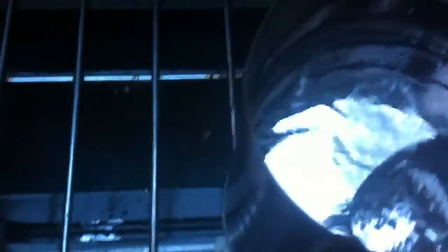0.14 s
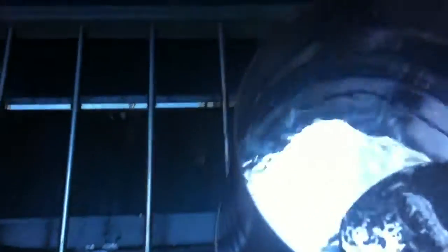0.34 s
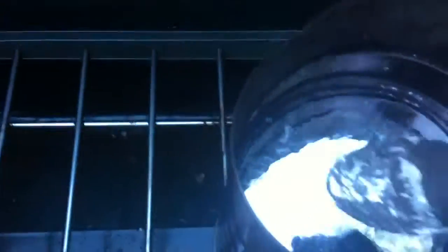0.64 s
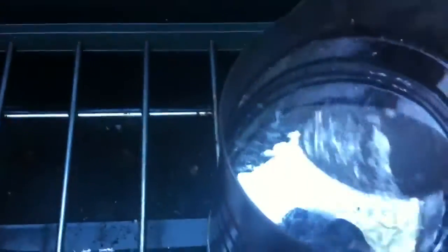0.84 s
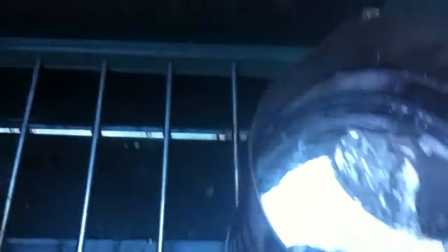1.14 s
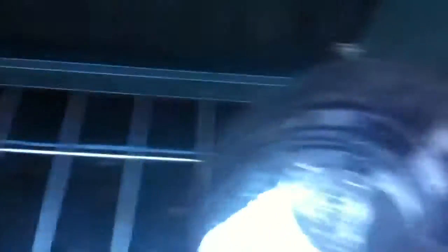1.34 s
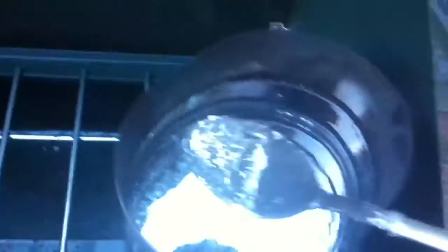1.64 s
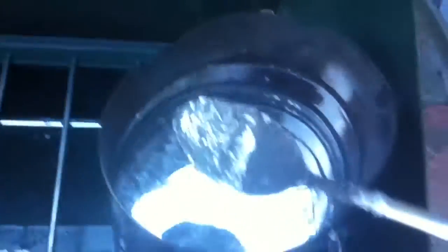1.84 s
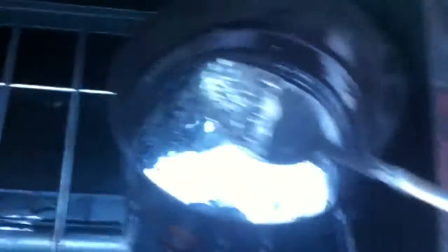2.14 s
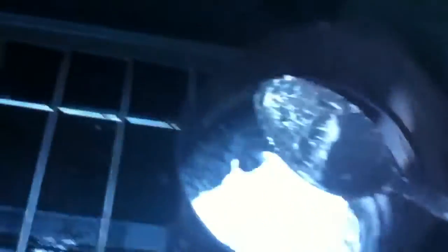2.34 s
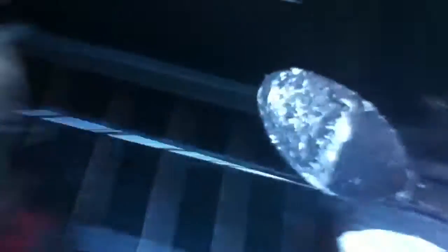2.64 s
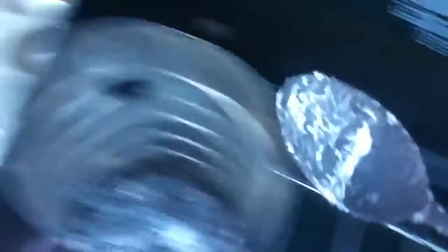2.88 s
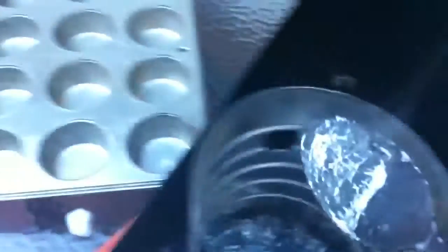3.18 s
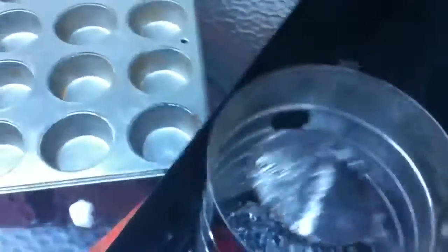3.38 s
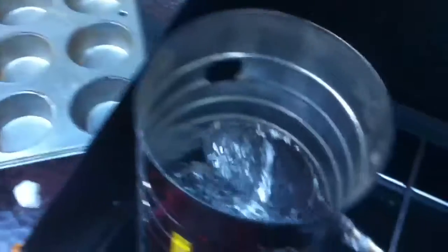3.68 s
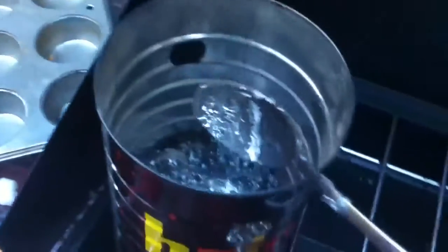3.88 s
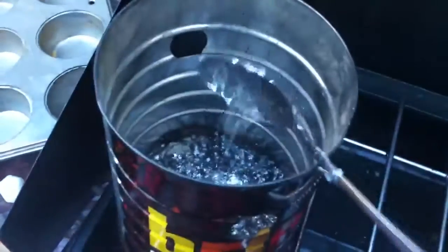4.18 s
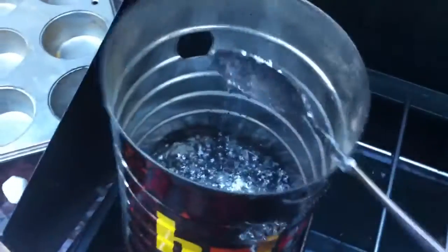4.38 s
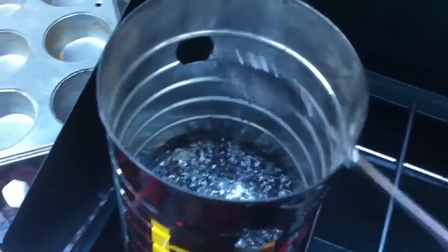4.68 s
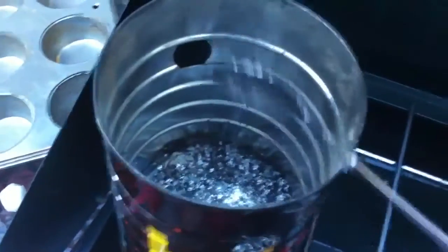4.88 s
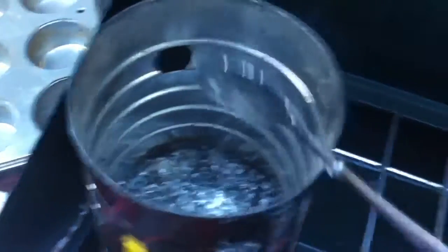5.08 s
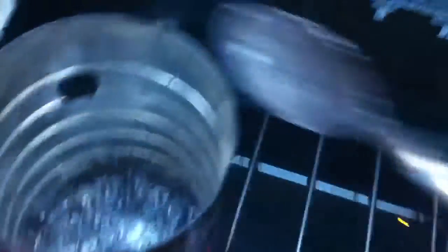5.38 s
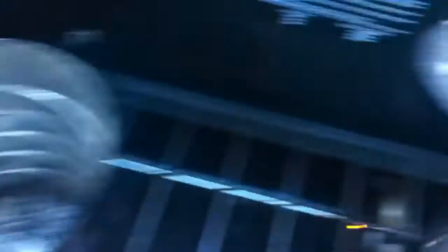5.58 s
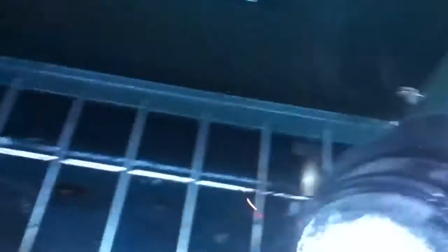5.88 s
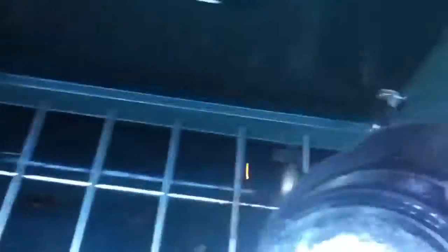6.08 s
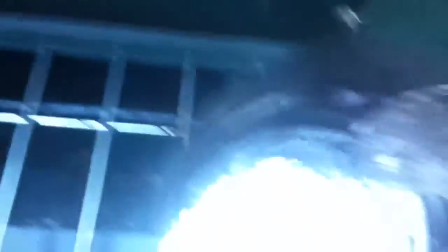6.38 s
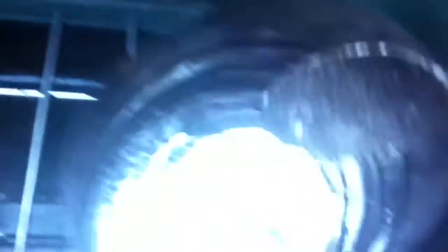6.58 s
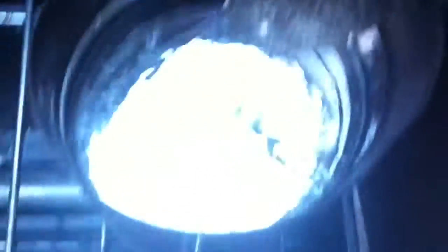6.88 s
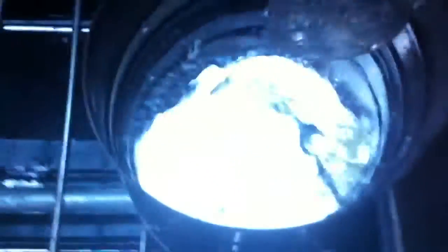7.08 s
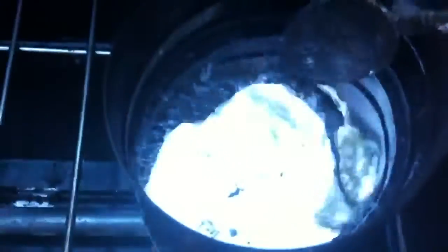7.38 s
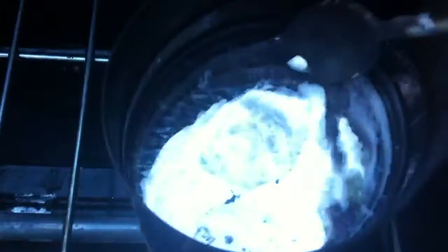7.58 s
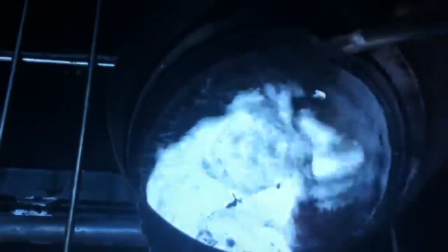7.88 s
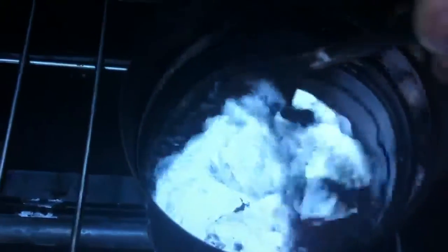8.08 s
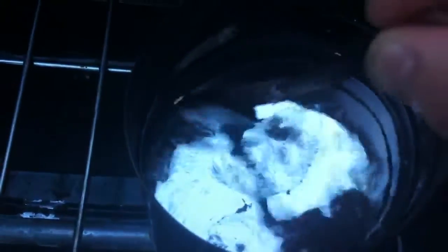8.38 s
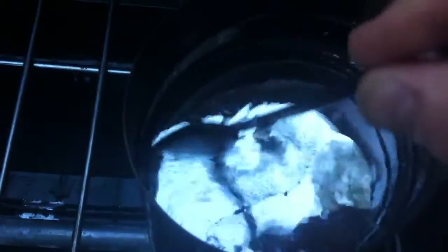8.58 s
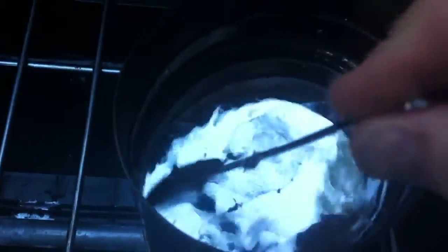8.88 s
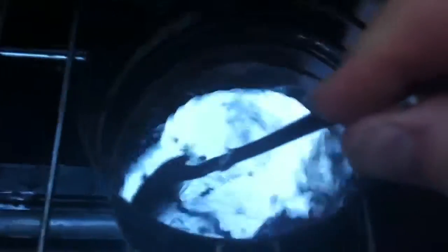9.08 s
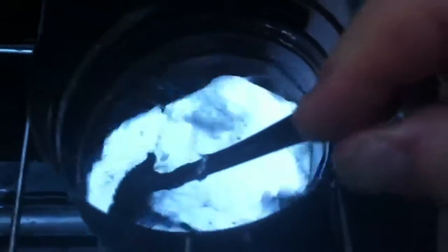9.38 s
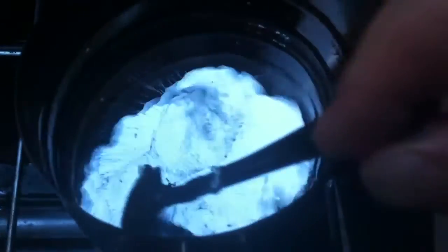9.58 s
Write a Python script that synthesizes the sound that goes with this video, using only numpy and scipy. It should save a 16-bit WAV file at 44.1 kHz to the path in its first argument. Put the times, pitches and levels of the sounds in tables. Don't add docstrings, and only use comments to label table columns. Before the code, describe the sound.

Close, thin-sounding pickup at a camp stove: a constant whistly, airy gas hiss with fluttering low flame. Midway comes a soft thud on tin, then about a second of irregular sharp metallic knocks with short hollow ring and small bounces. A tiny tick and a loud dull grate bump with quick rattle follow. Afterward only hiss remains, with a faint dull rustling scrape at the end.

```python
import sys
import numpy as np
from scipy import signal
from scipy.io import wavfile
from scipy.ndimage import uniform_filter1d, minimum_filter1d

SR = 44100
rng = np.random.default_rng(int(sys.argv[2]) if len(sys.argv) > 2 else 0)


def to_linear_factor(level_db):
    exponent = np.asarray(level_db, float) / 20
    return 10 ** exponent


def unload_audio(sound):
    columns = np.transpose(np.atleast_2d(sound))
    steps = np.round(np.clip(columns, -1, 1) * 32767)
    wavfile.write(sys.argv[1], SR, steps.astype(np.int16))


N = 429534
BLOWS_FROM_S, BLOWS_FOR_S = 3.5, 3.5

# time_s, gain_db
NEARNESS = [(0, 2), (.7, .5), (1.5, .5), (2.3, -1), (2.7, .5), (3.1, -.5), (3.6, 0), (4.15, -1),
            (5.5, -0.5), (6.0, 0.5), (6.5, -1.5), (7.2, -2.5), (7.9, -1), (8.6, 0), (9.2, -1), (9.74, -2.5)]
# time_s, share_0_to_1
ASIDE = [
    (0, 0.26),
    (2.75, 0.03),
    (3.0, 0.91),
    (5.5, 0.83),
    (5.9, 0.12),
    (9.74, 0),
]
# freq_hz, level_db_per_hz
FLAME = [(18, -79), (30, -36), (80, -15), (99, -14), (150, 2.5), (500, -10), (690, -9.5), (1150, -13.5),
         (1400, -27), (1820, -58), (3080, -120)]
# freq_hz, width_hz, level_db
JET_EDGE = [(13280, 170, -9), (13810, 120, -11), (14400, 260, -12), (14900, 220, -14), (15680, 150, -8)]
# freq_hz, width_hz, level_db
TUBE_OVER = [(688.0, 40, -1), (1715.5, 98, 2), (2017, 91, 1), (2146, 95, 1.5), (2306, 138, -4),
             (2584, 42, -1.5), (2975, 166, -4.0), (3270, 115, -13), (3787, 217, -10.0), (4160, 65, -17),
             (4490, 56, -8.5), (5115, 430, -16), (5797, 80, -13.0), (6225, 55, -12.0), (6813, 200, -12.0),
             (7384, 85, -9.0), (8030, 84, -7.5), (8640, 80, -14.5), (8650, 80, -18.5), (9340, 91, -14.0),
             (10000, 97, -10.5), (10750, 300, -13), (11600, 64, -27.0),
             (7660, 130, -14)] + [(1442, 130, -7), (11280, 79, -18.5), (12700, 120, -12)] + JET_EDGE
# freq_hz, width_hz, level_db
TUBE_ASIDE = [(710, 16, -15), (980, 33, -16.5), (1430, 82, -9.5), (1735, 73, -6.0), (2006, 42, 0.5),
              (2530, 31, -13), (3010, 36, -65), (3600, 510, -31.5), (4800, 1700, -11.5), (5380, 18, -11),
              (5680, 71, -5.5), (7030, 300, -11.5), (7670, 80, -5), (8400, 64, -7.0), (9600, 75, -21),
              (8900, 49, -29), (9260, 73, -22), (9950, 260, -18), (10500, 120, -10), (11700, 170, -34),
              (13100, 250, -17), (13140, 84, -5.5), (13700, 56, -18), (14000, 76, -5), (14400, 200, -22),
              (15200, 200, -14), (14360, 180, -2.5), (16300, 160, 1), (10900, 150, -22)]


def burner():
    near_db, = in_time(NEARNESS)
    aside, = in_time(ASIDE)
    flame_db = -57 + 0.17 * near_db
    low_db = -46.5 + 1.16 * near_db
    high_db = -50.5 + 0.27 * near_db

    flame = 0
    for hz, noise in bands(27.44, count=12, size=N):
        flame = flame + to_linear_factor(at_hz(FLAME, hz)) * wander((8, 2.5)) * noise
    flame = to_linear_factor(flame_db) * np.sqrt(shudder()) * rms_one(flame)

    over = tube(TUBE_OVER, low_db + 0.23, high_db + 0.51, sway_db=1.8, widen=1.34, span=slice(0, N))
    swing = slice(round(2.6 * SR), round(6.1 * SR))
    side = tube(TUBE_ASIDE, low_db + 0.24, high_db + 0.14, sway_db=2.2, widen=2.22, span=swing)
    diffuse = to_linear_factor(-56 + near_db) * filtered(rng.standard_normal(N), 2, 4100, "high")
    jet = np.sqrt(1 - aside) * over + np.sqrt(aside) * side + diffuse
    jet = wander((14, 0.5)) * reflected(jet)
    top_cut = signal.ellip(10, 0.5, 60, 15800, fs=SR, output="sos")
    return flame + signal.sosfilt(top_cut, jet)


def tube(peaks, low_db, high_db, sway_db, widen, span):
    out = np.zeros((2, N))
    jet = rng.standard_normal((2, N))[:, span]
    for k, (hz, width_hz, top_db) in enumerate(peaks):
        width_hz = max(width_hz, hz / 70) * widen
        spread_db = sway_db * min(1, hz / 5000 + 0.1)
        gain = to_linear_factor(top_db) * wander((1.5, spread_db), (7, 0.38 * sway_db))[span]
        once = resonate(jet[k % 2], hz, width_hz)
        out[int(hz > 4000), span] += gain * resonate(once, hz, width_hz)
    low_rms, high_rms = np.sqrt(np.mean(out[:, span] ** 2, axis=1))
    return to_linear_factor(low_db) * out[0] / low_rms + to_linear_factor(high_db) * out[1] / high_rms


def reflected(x):
    lag_s, gain = 0.0011, 0.25
    place = np.arange(N) - lag_s * SR * wander((0.8, 0.4))
    below = np.clip(place.astype(int), 0, N - 2)
    share = np.clip(place - below, 0, 1)
    echo = (1 - share) * x[below] + share * x[below + 1]
    return (x + gain * echo) / np.sqrt(1 + gain ** 2)


def shudder():
    gain = np.ones(N)
    for s, db, *_ in [*KNOCKS, *BUMPS]:
        if db > -15:
            gain += to_linear_factor(db + 25) * decay_from(s, 0.28)
    return gain


# start_s, peak_db, cavity_hz, ring_on_db, brightness_db
KNOCKS = [(4.2009, -13.5, 376, 1.5, -9), (4.4573, -10, 476, 1.5, -13), (4.5557, -35, 457, 18.5, -16),
          (4.6918, -11.5, 450, 1.5, -12.5), (4.7456, -37.5, 506, 12, -10), (4.855, -57, 363, 4, -34),
          (4.9037, -10.5, 440, 0.5, -15.5), (4.9683, -26.5, 418, 2.5, -16), (5.0143, -34.5, 366, 3, -11.5),
          (5.1029, -9.5, 438, 1.5, -14), (5.1812, -19, 380, -2, -12), (5.2311, -26, 356, 1, -16),
          (5.319, -40, 496, -23, -31), (5.461, -37, 423, -7, -29)]
# start_s, peak_db
SKIPS = [(4.557, -16), (4.746, -16.5), (4.854, -39), (4.968, -20.5), (5.181, -13.5), (5.23, -23),
         (5.32, -35), (5.375, -41), (5.414, -42), (5.445, -40), (5.503, -41)]
# freq_hz, level_db, t60_s
TIN = [(361, -4, 0.45), (786, -7, 0.41), (942, -9, 0.5), (1099, -9, 0.44), (1425, -8, 0.3), (1783, -3, 0.2),
       (1889, -3, .18), (2042, -5, 0.2), (2185, -6, 0.15), (2600, -5, .15), (2749, -3, .15),
       (2913, -4, 0.15), (3120, -1, 0.09), (3304, 1, 0.1), (3438, -1, 0.12), (3809, -1, 0.1),
       (4059, -2, 0.12), (4536, 4, 0.17), (4690, -5, .12), (4220, 2, 0.06), (5250, -6, .1),
       (6908, -3, 0.08), (7700, -8, .1), (5000, -7, 0.1), (9588, -6, 0.09), (10100, -9, 0.05),
       (11100, -14, 0.07)]
# freq_hz, level_db_per_hz
TIN_BODY = [(35, -67), (60, -57), (190, -6), (297, -12), (359, -0.5), (662, -18.5), (1740, -7), (3300, -8),
            (3700, -10.5), (6350, -16), (9930, -11.5), (15200, -21), (16000, -50)]
# freq_hz, t60_s
TIN_T60 = [(120, 0.9), (400, 0.46), (1000, 0.59), (2500, 0.21), (6000, 0.21), (15000, 0.098)]
# freq_hz, level_db, t60_s
WIRE = [(215, -36, 2.5), (365, -38, 2.5), (540, -37, 3.5)]


def tin():
    s, peak_db, cavity_hz, ring_db, bright_db = np.transpose(KNOCKS)
    walls = struck(s, peak_db - 10.5, -2, bright_db + 10.5, ring_db, TIN, TIN_BODY, TIN_T60,
                   modes_db=-10, body_db=18, crack_db=3)
    air = cavity(s + 0.00309, peak_db + 3.5, cavity_hz, t60=0.03)
    late = s > 5.05
    wires = sum(ring(clicks_at(s[late], peak_db[late] + db + 3), hz, t60) for hz, db, t60 in WIRE)
    spoon = 0
    for k, (start_s, db) in enumerate(SKIPS):
        bowl_hz = 2760 - 169 * (k % 3 == 0)
        spoon = spoon + ring(clicks_at([start_s], db), bowl_hz, 0.032)
    return walls + air + wires + spoon


def cavity(times, level_db, pitch_hz, t60):
    notes = zip(times, level_db, pitch_hz)
    return sum(resonate(ring(clicks_at([s], db), hz, t60), hz, 90) for s, db, hz in notes)


# start_s, peak_db
BUMPS = [(5.649, -8), (5.664, -16.5), (5.683, -24.5), (5.692, -28.5), (5.71, -20), (5.718, -31),
         (5.726, -20.5), (5.733, -29), (5.746, -38), (5.766, -50), (5.802, -46), (5.852, -45), (6.102, -44)]
# freq_hz, level_db, t60_s
GRATE = [(219, -4, 0.56), (313, 3, 0.27), (745, 4, 0.55), (883, 12, 0.39), (1000, 0, 0.33), (1200, 7, 0.5),
         (1287, 14.5, 0.41), (1403, 17, 0.25), (1870, -5, 0.22), (2610, 5, 0.23), (2620, -13, 0.25),
         (2977, -29, 0.51), (3343, -25, 0.46), (4180, -4, 0.45), (4040, -9, 0.47), (4700, -14, 0.39)]
# freq_hz, level_db_per_hz
GRATE_BODY = [(35, -61), (60, -40), (209, -2), (465, -7), (536, -4), (647, -11), (1410, -2), (2200, -8),
              (12000, -40), (15500, -53), (16700, -63)]
# freq_hz, t60_s
GRATE_T60 = [(120, 1), (400, 0.62), (1500, 0.41), (5000, 0.44), (15000, 0.22)]


def grate():
    s, peak_db = np.transpose(BUMPS)
    bright_db = np.interp(s - s[0], [0, 0.018], [-17, 10])
    return struck(s, peak_db - 16.5, 0.1, bright_db, 0.11, GRATE, GRATE_BODY, GRATE_T60,
                  modes_db=-14, body_db=12, crack_db=17.5)


# time_s, scrape_db
SKIM = [(7.3, -79), (7.9, -58.5), (8.1, -54.5), (8.3, -58.5), (8.6, -52.5), (9.2, -51), (9.4, -62),
        (9.55, -56), (9.74, -51.5)]
# start_s, level_over_scrape_db
NUDGES = [
    (7.65, 16),
    (8.098, 1),
    (8.27, -1),
    (8.76, 2),
    (9.05, -6),
]
# freq_hz, width_hz, level_db
MELT_CAN = [(278, 41, 8), (450, 86, -5.5), (673, 230, -4.5), (884, 43, 4), (1350, 310, -5)]


def skimming():
    sizes = to_linear_factor(3 * np.minimum(rng.exponential(1, N), 5)) * rng.choice([-1, 1], N)
    slips_per_s = 2500 * wander((6, 3))
    slips = sizes * (rng.random(N) < slips_per_s / SR)
    catch = 1 + sum(to_linear_factor(db) * decay_from(s, 0.035) for s, db in NUDGES)
    through_can = sum(to_linear_factor(db) * resonate(slips * catch, hz, width_hz * 1.5) for hz, width_hz, db in MELT_CAN)
    return to_linear_factor(in_time(SKIM)[0]) * rms_one(through_can)


# start_s, peak_db, cavity_hz
THUD = [
    (3.739, -33.5, 415),
    (3.756, -38, 405.5),
    (3.799, -63, 325),
]


def thud():
    s, peak_db, cavity_hz = np.transpose(THUD)
    walls = struck(s, peak_db, 1.1, -6, 0.1, TIN[:6], TIN_BODY, TIN_T60,
                   modes_db=-16, body_db=7.5, crack_db=12.5)
    return filtered(walls, 6, 2400, "low") + cavity(s, peak_db - 0.5, cavity_hz, t60=0.3)


# start_s, peak_db
TICKS = [
    (5.4615, -17),
    (5.474, -33),
    (6.1, -36),
]


def ticks():
    s, peak_db = np.transpose(TICKS)
    snap = fade(clicks_at(s, peak_db), np.exp(-1 / (0.0006 * SR)))
    return resonate(snap * rng.choice([-1, 1], len(snap)), 2500, 6000)


def struck(times, peak_db, low_db, high_db, ring_db, modes, body, t60s, modes_db, body_db, crack_db):
    spread_db = 3 * rng.normal(0, 1, (len(times), len(modes)))
    out = 0
    for k, (hz, db, t60) in enumerate(modes):
        treble_db = (hz > 5500) * high_db / 2
        blow = clicks_at(times, peak_db + ring_db + db + modes_db + treble_db + spread_db[:, k])
        out = out + ring(blow, hz, min(t60, at_hz(t60s, hz)))
    for hz, noise in bands(58.8, count=16, size=len(out)):
        color = np.interp(np.log(hz), np.log([400, 900, 4000, 9000]), [-1, 0, 0, 1])
        blow_db = peak_db + max(-color, 0) * low_db + max(color, 0) * high_db
        tail = fade(clicks_at(times, blow_db + ring_db), to_linear_factor(-60 / (at_hz(t60s, hz) * SR)))
        crack = fade(clicks_at(times, blow_db + crack_db), np.exp(-1 / (0.0058 * SR)))
        swell = np.exp(-hz / (1.5 * SR))
        envelope = signal.lfilter([1 - swell], [1, -swell], tail + crack)
        out += to_linear_factor(body_db + at_hz(body, hz)) * noise * envelope
    return out


def clicks_at(times, db):
    out = np.zeros(round(BLOWS_FOR_S * SR))
    out[np.round((np.asarray(times) - BLOWS_FROM_S) * SR).astype(int)] = to_linear_factor(db)
    return out


def ring(clicks, hz, t60):
    r, w = to_linear_factor(-60 / (t60 * SR)), 2 * np.pi * hz / SR
    return signal.lfilter([0, np.sin(w)], [1, -2 * r * np.cos(w), r * r], clicks + 1e-18)


def resonate(x, hz, width_hz):
    r, w = np.exp(-np.pi * width_hz / SR), 2 * np.pi * hz / SR
    return signal.lfilter(np.array([1, 0, -1]) * (1 - r * r) / 2, [1, -2 * r * np.cos(w), r * r], x)


def fade(clicks, keep):
    return signal.lfilter([1], [1, -keep], clicks)


def decay_from(start_s, decay_s):
    t = np.arange(N) / SR - start_s
    return (t > 0) * np.exp(-np.maximum(t, 0) / decay_s)


def filtered(x, order, hz, kind):
    return signal.sosfilt(signal.butter(order, hz, kind, fs=SR, output="sos"), x)


def bands(lowest_hz, count, size):
    white = rng.standard_normal((2, size))
    for k in range(count):
        low = lowest_hz * 2 ** (k / 2)
        yield low * 2 ** 0.25, filtered(white[k % 2], 2, [low, low * np.sqrt(2)], "band")


def wander(*rates_and_db):
    total_db = 0
    for rate, spread_db in rates_and_db:
        r = np.exp(-80 * np.pi * rate / SR)
        slow = signal.lfilter([1], [1, -2 * r, r * r], rng.standard_normal(N // 40 + 2002))[2000:]
        total_db = total_db + spread_db * rms_one(slow)
    return np.interp(np.arange(N) / 40, np.arange(len(total_db)), to_linear_factor(total_db))


def rms_one(x):
    return x / np.sqrt(np.mean(x ** 2) + 1e-20)


def in_time(rows):
    s, *columns = np.transpose(rows)
    return [np.interp(np.arange(N) / SR, s, c) for c in columns]


def at_hz(points, hz):
    point_hz, value = np.transpose(points)
    return np.interp(np.log(hz), np.log(point_hz), value)


def scene():
    out = burner() + skimming()
    blows = tin() + thud() + grate() + ticks()
    start = round(BLOWS_FROM_S * SR)
    out[start:start + len(blows)] += blows
    return out[None]


def gate(x):
    hz, _, z = signal.stft(x, SR, nperseg=2048, noverlap=1536)
    power = uniform_filter1d(uniform_filter1d(np.abs(z) ** 2, size=4, axis=0), size=4, axis=1)
    audibility = power / np.sqrt(uniform_filter1d(power, size=60, axis=0) + 1e-30)
    treble = hz > 3000
    threshold = np.quantile(audibility[treble & (hz < 15500)], 0.16)
    z[treble[:, None] & (audibility < threshold)] = 0
    top_band = hz > 15800
    top = power[top_band].sum(axis=0)
    z[top_band[:, None] & (top < top.max() * to_linear_factor(-2 * 14))] = 0
    return signal.istft(z, SR, nperseg=2048, noverlap=1536)[1][:N]


def hush_before_blows(x):
    treble = signal.sosfiltfilt(signal.butter(4, 2600, "high", fs=SR, output="sos"), x)
    level = uniform_filter1d(np.abs(treble), size=128)
    coming = np.roll(-minimum_filter1d(-level, size=600), -300)
    hush = uniform_filter1d(1.0 * (coming > 30 * level), size=64)
    return x - hush * treble


def roll_off(x):
    return signal.sosfilt(signal.butter(12, 16810, fs=SR, output="sos"), x)


def record(dry):
    thin = filtered(dry[0], 1, 120, "high")
    rounded = 0.87 * np.tanh(thin / 0.94)
    mix = hush_before_blows(gate(rounded))[None]
    return roll_off(mix)


dry = scene()
out = record(dry)
unload_audio(out)
```